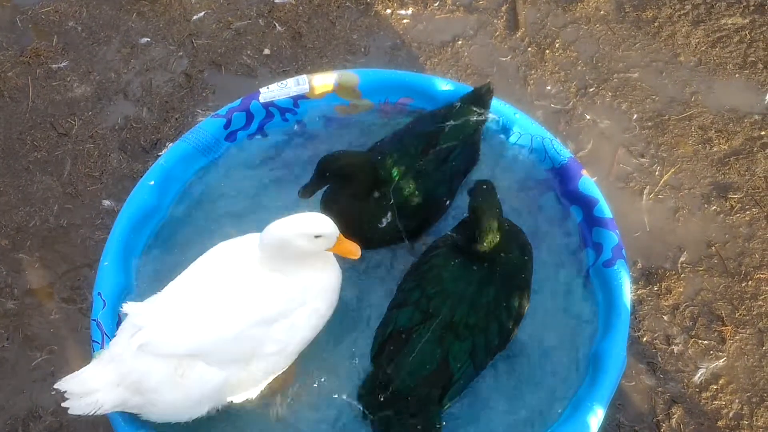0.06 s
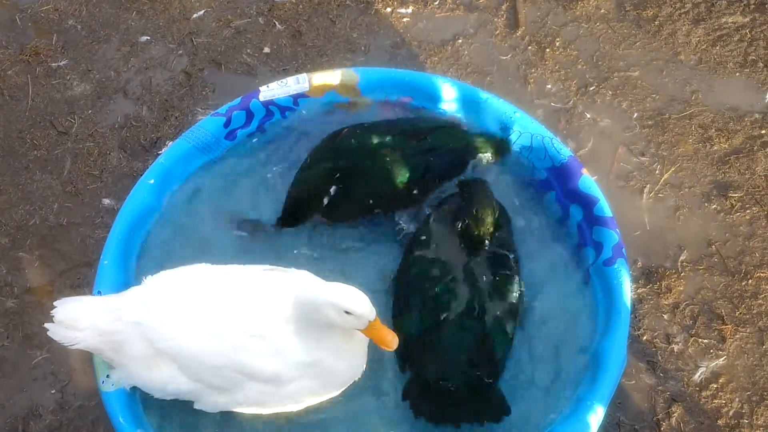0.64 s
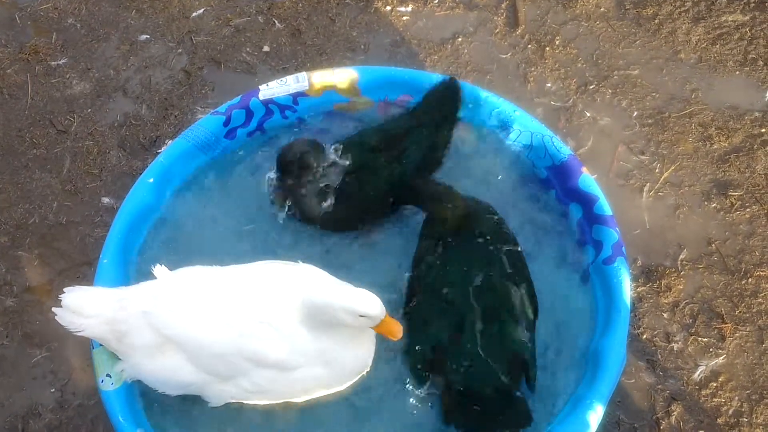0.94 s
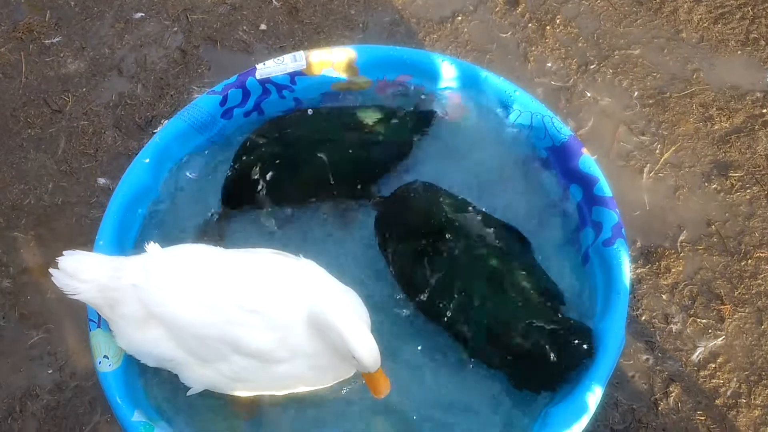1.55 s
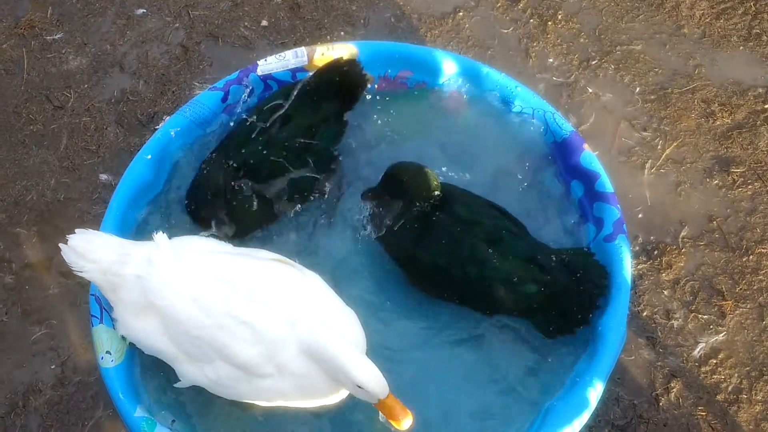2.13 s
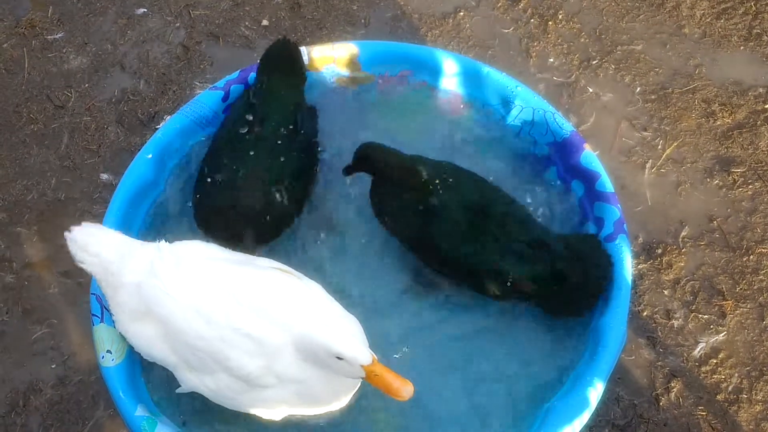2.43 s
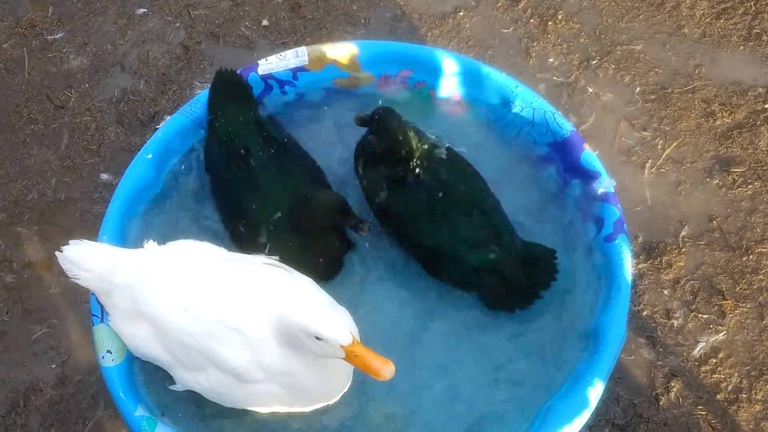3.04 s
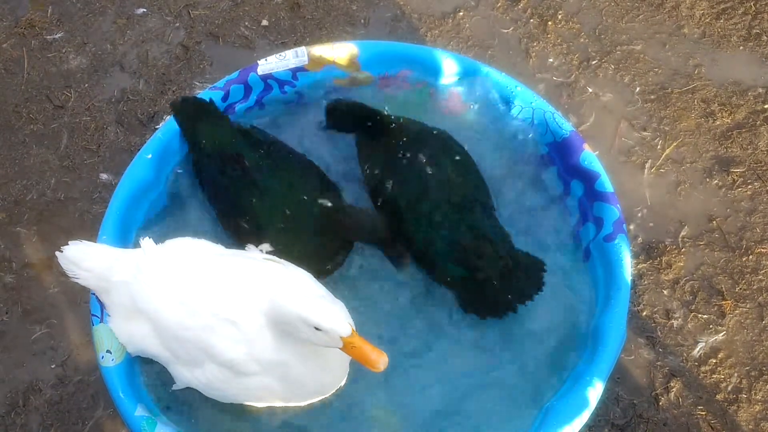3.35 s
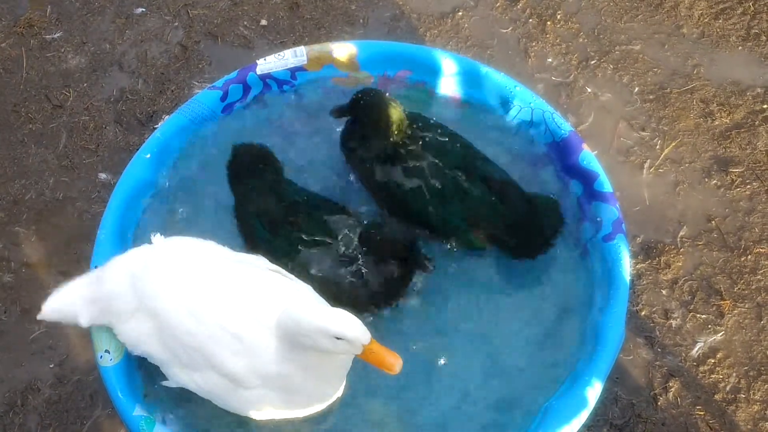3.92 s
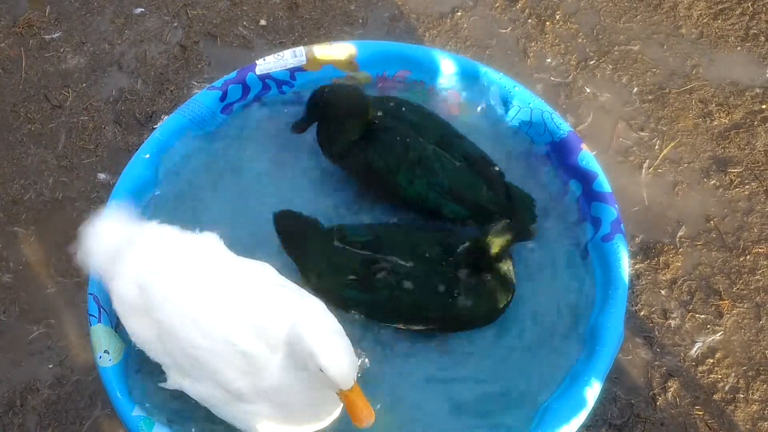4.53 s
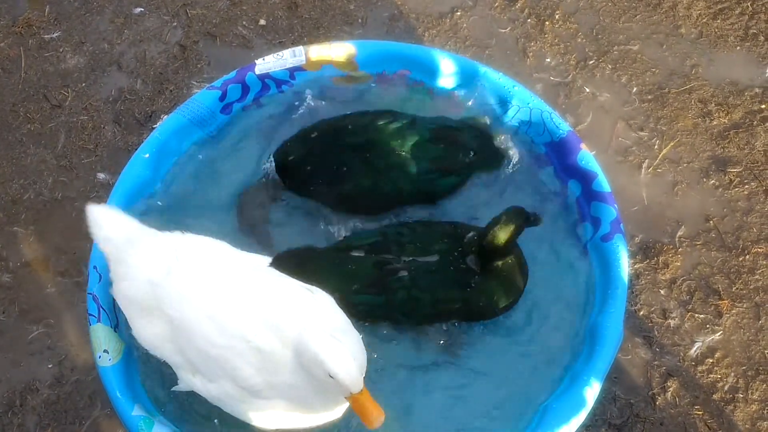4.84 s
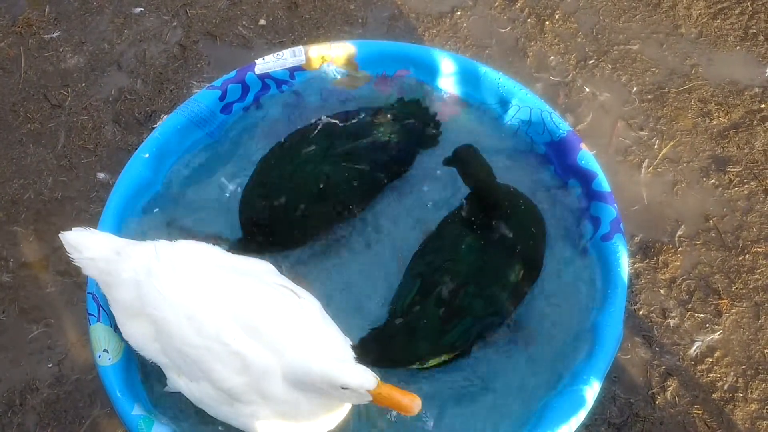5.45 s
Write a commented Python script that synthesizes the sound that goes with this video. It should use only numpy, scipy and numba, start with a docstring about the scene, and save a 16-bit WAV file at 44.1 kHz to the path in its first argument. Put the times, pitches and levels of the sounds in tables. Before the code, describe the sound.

Water sloshes and bubbles close below the microphone as ducks paddle around a plastic pool in quiet open air. A short cluster of rubbery squeaks ends in a hollow knock. Dipping heads then make small irregular splashes and scatter ticking drops, with soft deep pulses from their strokes. Feet judder on the pool wall midway, splashing picks up again, and a few more squeaks and knocks come toward the end.

```python
"""Three ducks squeak, judder and splash in a small plastic pool outdoors, a metre below the microphone.
Stick-slip friction of wet feet and bodies on the plastic gives the squeaks and rings the pool wall.
Dipping heads trap air, which resonates as bubbles, and throw spray that falls back as drops.
Paddle strokes send out low pressure pulses, and the stirred water gurgles and sloshes beneath."""
import sys
import numpy as np
from scipy import signal
from scipy.fft import rfft, irfft
from scipy.io import wavfile
from numba import njit

SR = 44100
rng = np.random.default_rng(int(sys.argv[2]) if len(sys.argv) > 2 else 0)


def waveform_to_disk(signal):
    """Save audio, clipped to [-1, 1], as 16-bit WAV at the path in sys.argv[1]."""
    frames = np.transpose(np.atleast_2d(signal))
    scaled = np.clip(frames, -1, 1) * 32767
    samples = np.round(scaled).astype(np.int16)
    wavfile.write(sys.argv[1], SR, samples)


N = 250488
T = np.arange(N) / SR


def amp(db):
    """Amplitude ratio of a level in decibels."""
    return 10 ** (np.asarray(db) / 20)


def unit(x):
    """Normalisation to rms 1."""
    return x / np.sqrt(np.mean(x ** 2))


def band(x, lo_hz, hi_hz, order=2):
    """Butterworth band-pass."""
    return signal.sosfilt(signal.butter(order, [lo_hz, hi_hz], "band", fs=SR, output="sos"), x)


def noise(lo_hz, hi_hz, order=2, shape=N):
    """Band-limited Gaussian noise; rms 1."""
    return unit(band(rng.standard_normal(shape), lo_hz, hi_hz, order))


def colour(x, spectrum):
    """Spectral shaping by rows of (frequency [Hz], gain [dB])."""
    hz, db = np.transpose(spectrum)
    f = np.fft.rfftfreq(N, 1 / SR) + 1
    return irfft(rfft(x) * amp(np.interp(np.log(f), np.log(hz), db)), N)


def curve(table, column):
    """Amplitude envelope interpolated from a level column of a table."""
    rows = np.array(table, float)
    return amp(np.interp(T, rows[:, 0], rows[:, column]))


def wake(times, db, rise_s, fall_s):
    """Incoherent addition: the envelopes of disturbances that swell and decay sum in power."""
    age = T[:SR]
    shape = np.minimum(age / rise_s, 1) * np.exp(-np.maximum(age - rise_s, 0) / fall_s)
    power = np.zeros(N + SR)
    for first, gain in zip(T.searchsorted(times), amp(db)):
        power[first:first + SR] += (gain * shape) ** 2
    return np.sqrt(power[:N])


@njit
def rings(start, hz, t60, size, glide):
    """Damped oscillators: each builds up in about a cycle and rises in pitch by the fraction glide."""
    out = np.zeros(N)
    for k in range(len(start)):
        first, life, phase = int(start[k] * SR), t60[k] * SR, 0.
        for i in range(max(0, min(int(life), N - first))):
            phase += 2 * np.pi * hz[k] * (1 + glide * i / life) / SR
            envelope = (1 - np.exp(-phase / np.pi)) * np.exp(-np.log(1000) * i / life)
            out[first + i] += size[k] * envelope * np.sin(phase)
    return out


def bubbles(count, lo_hz, hi_hz, cycles, spread_db, glide):
    """Bubble resonance in a random cloud, with power-law amplitudes; rms 1."""
    when, pitch, life, size = rng.random((count, 4)).T
    hz = lo_hz * (hi_hz / lo_hz) ** pitch
    t60 = cycles * (.5 + life) ** 2 / hz
    gain = amp(-spread_db * np.log(np.maximum(size, .02)))
    return unit(rings(when * N / SR, hz, t60, gain, glide))


def ambience():
    """Diffuse noise: low outdoor air and a faint hiss, uncorrelated between the channels."""
    air = amp(-53.5) * noise(110, 1230, shape=(2, N))
    hiss = amp(-64) * noise(930, 7600, order=1, shape=(2, N))
    return air + hiss


# the body of water swinging in the pool: (time [s], level [dB])
SLOSH_LEVELS = [(0, -52), (.95, -34), (1.3, -41), (1.8, -38), (2.6, -40.5), (3, -45), (3.6, -47.5),
                (4.1, -38.5), (5.1, -47), (5.67, -53)]

def slosh():
    """Wave collision: small waves meet and give short, low, damped pulses."""
    pulses = bubbles(count=450, lo_hz=73, hi_hz=219, cycles=5.2, spread_db=3, glide=.093)
    return curve(SLOSH_LEVELS, 1) * pulses


# paddle strokes: (time [s], level [dB], frequency [Hz])
PADDLE_STROKES = [(0.45, -17, 151), (0.676, -27, 113), (.756, -22, 194), (0.895, -10, 148),
                  (0.939, -9.5, 126), (1.041, -21, 119), (1.067, -21, 132), (2.369, -15.5, 145),
                  (2.481, -15.5, 122), (3.115, -8.5, 140), (3.944, -17.5, 114), (4.375, -15.5, 171)]

def thumps(width_cycles=.48, push_s=.0046):
    """Volume displacement: a stroke shoves the water once, giving about one cycle of pressure."""
    out = np.zeros(N)
    for time, db, hz in PADDLE_STROKES:
        cycles = (T - time - push_s) * hz
        near = abs(cycles) < 3
        window = np.exp(-(cycles[near] / width_cycles) ** 2 / 2)
        out[near] -= amp(db) * window * np.sin(2 * np.pi * cycles[near])
    return out


# spectrum of the soft wash: (frequency [Hz], gain [dB])
WASH_SPECTRUM = [(76, -25), (130, -0.5), (179, -0.5), (376, -3.5), (546, 1), (660, -5.5), (881, 1.5),
                 (1020, -1.5), (1440, -11.5), (1650, -26), (2140, -34), (3630, -120)]
# surface stirred by swimming: (time [s], bubbling level [dB], spray level [dB])
STIR_LEVELS = [(0.0, -52, -57.5), (0.4, -51.5, -60.5), (0.49, -49.5, -52.5), (1.09, -50, -47),
               (1.42, -53, -54.5), (1.99, -45, -48), (2.29, -48, -53), (2.97, -47, -48.5),
               (3.32, -48.5, -53), (3.65, -50, -51), (4.02, -44, -48.5), (4.32, -53.5, -55.5),
               (4.65, -53.5, -57.5), (4.89, -50.5, -57), (5.09, -46.5, -49.5), (5.38, -51.5, -54),
               (5.68, -46, -47.5)]

def water(gurgle_db=-2.5, wash_db=-1, churn_db=-29, foam_db=-5.5):
    """Air entrainment: swimming, strokes and splashes keep bubbles gurgling over a soft wash."""
    gurgle = bubbles(count=1400, lo_hz=577, hi_hz=1422, cycles=11.6, spread_db=6, glide=.27)
    wash = unit(colour(rng.standard_normal(N), WASH_SPECTRUM))
    times, db, _ = np.transpose(PADDLE_STROKES)
    churn = wake(times, db + churn_db, rise_s=.0072, fall_s=.018)
    foam = amp(foam_db) * showers()
    stirred = np.sqrt(curve(STIR_LEVELS, 1) ** 2 + churn ** 2 + foam ** 2)
    return stirred * (amp(gurgle_db) * gurgle + amp(wash_db) * wash)


def spatter(count, spread_db, decay_s):
    """Shot noise: sheets of water break into wet slaps, each a brief noise burst; rms 1."""
    when, size = rng.random((count, 2)).T
    gain = amp(-spread_db * np.log(np.maximum(size, .02)))
    hits = np.bincount((when * N).astype(int), gain ** 2, N)
    power = signal.lfilter([1], [1, -np.exp(-2 / (decay_s * SR))], hits)
    return unit(np.sqrt(power) * rng.standard_normal(N))


# colouring of the falling spray: (frequency [Hz], gain [dB])
SPRAY_SPECTRUM = [(700, -6), (1500, 1), (2000, 11.5), (2500, 0.5), (4800, -1), (6300, -1.5), (8000, -8.5),
                  (12500, -10.5), (15300, -4.5)]

def spray(swim_db=.5, slaps_db=.5):
    """Superposed impacts: one duck's spray lands as slaps, crackle and plinks; splashes add fizz."""
    slaps = amp(slaps_db) * spatter(count=420, spread_db=4.2, decay_s=.003)
    crackle = bubbles(count=4500, lo_hz=2200, hi_hz=15400, cycles=16, spread_db=3.2, glide=.1)
    plinks = amp(-4) * bubbles(count=800, lo_hz=1450, hi_hz=4900, cycles=34, spread_db=3, glide=.15)
    bunches = amp(2.5 * noise(8, 30))
    mist, fizz = rng.standard_normal((2, N))
    falling = bunches * (slaps + crackle) + plinks + amp(-4.5) * mist
    swimming = amp(swim_db) * curve(STIR_LEVELS, 2) * unit(colour(falling, SPRAY_SPECTRUM))
    splashing = showers() * unit(colour(fizz + (slaps + plinks) / 2, SPRAY_SPECTRUM))
    return swimming + splashing


# flung drops hitting the surface: (time [s], level [dB])
DROP_IMPACTS = [(0.1469, -41), (0.412, -33), (0.5474, -43), (0.6373, -37), (.9403, -36.5), (0.9816, -36),
                (1.0253, -37), (1.1102, -41.5), (1.514, -37.5), (1.6098, -34), (1.6597, -34), (2.0622, -36),
                (2.4628, -40.5), (2.5028, -40), (2.597, -31), (2.65, -41), (2.7394, -36), (2.7784, -33.5),
                (2.92, -33.5), (3.2342, -42.5), (3.787, -38.5), (4.452, -51), (4.462, -43.5), (4.4977, -42),
                (4.5526, -43), (4.606, -41), (5.166, -35.5), (5.4949, -34.5), (5.557, -44)]

def drops(tick_db=2.5, tick_decay_s=.0024, bubble_db=-3, bubble_hz=4400, bubble_t60=.018):
    """Drop impact: a sharp tick on the water, with the resonance of a tiny trapped bubble."""
    times, db = np.transpose(DROP_IMPACTS)
    hits = np.zeros(N)
    hits[(times * SR).astype(int)] = amp(db)
    envelope = signal.lfilter([1], [1, -np.exp(-1 / (tick_decay_s * SR))], hits)
    ticks = amp(tick_db) * envelope * noise(850, 9000, order=1)
    hz = bubble_hz * 2 ** (rng.standard_normal(len(times)) / 10)
    return ticks + rings(times, hz, np.full(len(times), bubble_t60), amp(db + bubble_db), 0.)


# plopping bubbles and, at 0.466 s, the plastic wall ringing at 745 Hz after a foot's judder:
# (time [s], frequency [Hz], level [dB], t60 [s], pitch rise [fraction])
RESONANCES = [(0.345, 4200, -17.5, 0.0042, 0.11), (.466, 745, -12, 0.055, 0.017),
              (0.748, 1033, -28, 0.084, .05), (.927, 841, -28, 0.15, 0.24), (1.044, 892, -30.5, 0.091, .1),
              (1.071, 592, -30.5, 0.23, 0.36), (2.204, 1022, -28.5, 0.075, .18),
              (2.422, 1274, -33.5, 0.057, 0.023), (2.924, 1200, -19, 0.045, 0.17),
              (3.004, 1260, -35.5, 0.11, .05), (3.799, 2540, -38, 0.042, 0.22),
              (3.801, 900, -34.5, 0.052, 1.4), (3.832, 1094, -22, 0.051, 0.57), (3.869, 626, -26, 0.048, 0),
              (4.058, 1087, -36.5, 0.12, 1.43), (4.286, 1005, -33, 0.1, 0.22),
              (5.422, 878, -35.5, 0.13, .4), (5.594, 2424, -28, 0.027, 0)]

def plops_and_wall_ring():
    """Free vibration: bubbles ring, rising in pitch near the surface, and the pool wall rings once."""
    out = np.zeros(N)
    for time, hz, db, t60, rise in RESONANCES:
        out += rings(*np.array([[time], [hz], [t60], [amp(db)]]), float(rise))
    return out


# heads and wings breaking the surface:
# (time [s], air pocket level [dB], centre frequency [Hz], spray level [dB])
SURFACE_SLAPS = [(.46, -14.5, 1070, -54), (.935, -24, 884, -49), (1.103, -29, 1080, -40.5),
                 (1.144, -23.5, 1380, -53), (1.358, -24.5, 960, -42), (1.468, -28.5, 935, -71),
                 (1.641, -21, 1260, -47), (1.764, -23.5, 970, -48), (1.891, -27.5, 1120, -67),
                 (2.025, -23, 1310, -56), (2.116, -19.5, 880, -39), (3.843, -17, 1386, -49.5),
                 (3.915, -22.5, 700, -59), (4.121, -27.5, 1050, -64), (5.226, -28, 1000, -47),
                 (5.404, -26.5, 619, -51), (5.588, -33, 765, -63)]

def splashes(count=10, mean_delay_s=.013, spread_octaves=.536, cycles=13, cluster_db=-3.5, hiss_db=-23):
    """Cavity resonance: a slap traps an air pocket, then weaker bubbles, and throws a short hiss."""
    ringing, burst = np.zeros(N), np.zeros(N)
    for time, db, centre_hz, _ in SURFACE_SLAPS:
        delay = mean_delay_s * rng.exponential(size=count)
        hz = centre_hz * 2 ** (spread_octaves * rng.standard_normal(count))
        size = amp(db + cluster_db) * np.exp(-delay / .024)
        delay[0], hz[0], size[0] = 0, centre_hz, amp(db)  # the air pocket
        ringing += rings(time + delay, hz, cycles / hz, size, .12)
        first = T.searchsorted(time)
        span = slice(first, first + SR // 5)
        burst[span] += amp(db + hiss_db) * np.exp(-(T[span] - time) / .018)
    return ringing + burst * noise(630, 5300)


def showers():
    """Exponential decay: the envelope of the spray that each splash throws up and that falls back."""
    times, _, _, spray_db = np.transpose(SURFACE_SLAPS)
    return wake(times, spray_db, rise_s=.0087, fall_s=.05)


# a foot juddering on the wall: (start [s], length [s], level [dB], centre frequency [Hz])
FOOT_JUDDERS = [(.196, 0.0059, -28, 734), (0.284, 0, -28, 550), (0.4623, .0062, -9, 1180),
                (1.283, 0, -35.5, 1030), (2.276, 0.016, -23.5, 880), (2.777, 0.0049, -26.5, 945),
                (2.809, 0.00067, -27, 910), (2.9373, 0.033, -14.5, 1030), (3.11, 0.027, -23.5, 716),
                (3.418, 0.0065, -22, 574), (3.53, 0.0087, -22, 648), (4.023, 0.0012, -25.5, 537),
                (4.2062, 0.00093, -22, 934), (4.276, 0, -29, 800), (4.619, 0.0023, -31.5, 484),
                (4.67, 0.0052, -22.5, 705), (4.826, 0.00029, -29.5, 644), (4.885, 0.013, -25, 790),
                (5.002, 0.0048, -29.5, 441.6), (5.044, 0.0036, -26, 599), (5.2098, 0.0059, -9, 629.7),
                (5.493, 0.013, -19, 1125), (5.62, 0.0013, -24, 520)]

def slips(interval_s=.008, arch_db=9.5):
    """Slow stick-slip: a judder is one slip or a run of them, strongest in its middle."""
    rows = []
    for start, length, db, hz in FOOT_JUDDERS:
        count = 1 + round(length / interval_s)
        times = np.linspace(start, start + length, count)
        off_middle = (2 * np.arange(count) + 1) / count - 1
        rows += [(time, db - arch_db * off ** 2, hz) for time, off in zip(times, off_middle)]
    return rows


# modes of the water-loaded plastic wall: (frequency [Hz], relative level [dB], t60 [s])
WALL_MODES = [(276, 7.5, 0.032), (420, 11.5, 0.016), (558, 0, 0.035), (749, 1, 0.012), (982, 7, 0.013),
              (1189, 4, 0.025), (1696, -4, 0.014), (1830, 1.5, 0.025), (2650, 0, 0.021)]

def knocks(focus_db_per_octave=7, detune=.079, patch_t60=.016, wall_db=14):
    """Modal response: each slip rings the patch under the foot and the wall modes near its pitch."""
    times, db, centre_hz = np.transpose(slips())
    mode_hz, mode_db, t60 = np.transpose(WALL_MODES)
    octaves_away = abs(np.log2(mode_hz / centre_hz[:, None]))
    weight = amp(mode_db - focus_db_per_octave * octaves_away)
    size = amp(db[:, None] + wall_db) * weight / weight.sum(axis=1, keepdims=True)
    hz = mode_hz * (1 + detune * rng.standard_normal(size.shape))
    wall = rings(np.repeat(times, len(mode_hz)), hz.ravel(), np.tile(t60, len(times)), size.ravel(), 0.)
    patch = rings(times, centre_hz, np.full(len(times), patch_t60), amp(db), 0.)
    # soft skin rounds the blow, and the thin wall radiates little bass
    return band(wall + patch, 140, 6100)


# wet skin sliding on plastic:
# (start [s], end [s], first pitch [Hz], middle pitch [Hz], last pitch [Hz], level [dB])
SKIN_SLIDES = [(0.335, 0.402, 990, 953, 1305, -19.5), (0.407, 0.431, 1480, 995, 1520, -20.5),
               (0.442, 0.468, 1156, 825, 860, -20), (0.458, 0.482, 1296, 1220, 1170, -14),
               (0.88, 0.917, 1105, 1258, 1970, -32.5), (1.125, 1.159, 924, 1260, 1900, -41),
               (1.373, 1.404, 1080, 1210, 1750, -40), (2.771, 2.819, 1240, 1774, 2990, -38),
               (4.183, 4.222, 1250, 962, 960, -35.5), (4.822, 4.88, 1304, 1845, 1030, -43.5),
               (5.059, 5.118, 792, 1157, 1010, -27), (5.19, 5.21, 1297, 910, 715.7, -23),
               (5.456, 5.518, 730, 583, 725.5, -34)]

def squeaks(overtone_db=-17, edge_s=.0068, rasp_db=-23, jitter=.035, flutter_db=2.6):
    """Fast stick-slip: a harmonic tone whose pitch follows the sliding speed; each slip rasps."""
    out = np.zeros(N)
    waver, flutter = noise(150, 450), noise(150, 450)
    scrape = amp(rasp_db) * noise(2200, 4100)
    for start, end, first_hz, middle_hz, last_hz, db in SKIN_SLIDES:
        on = (T > start) & (T < end)
        t = T[on]
        progress = (t - start) / (end - start)
        hz = np.polyval(np.polyfit([0, .5, 1], [first_hz, middle_hz, last_hz], 2), progress)
        # the slide begins smooth and turns raspy before the skin grips again
        rough = np.sin(np.pi * progress ** 2)
        phase = 2 * np.pi * np.cumsum(hz * (1 + jitter * rough * waver[on])) / SR
        # a wall resonance lifts the second harmonic near 1200 Hz
        lift_db = 13.5 * np.exp(-((2 * hz - 1200) / 300) ** 2)
        tone = np.sin(phase) + amp(overtone_db + lift_db) * np.sin(2 * phase)
        tone += amp(overtone_db - 7) * np.sin(3 * phase)
        # a second patch of skin slips at a lower pitch and beats against the first
        tone += amp(-7) * rough ** 2 * np.sin(.79 * phase)
        rasp = rough * (1 + np.cos(phase)) * scrape[on]
        swell = np.clip(np.minimum(t - start, end - t) / edge_s, 0, 1)
        out[on] += amp(db + flutter_db * rough * flutter[on]) * swell * (tone + rasp)
    return out


def widen(x, treble_lag_ms, split_hz=1400, bass_lag_ms=.099, dip_depth=.64):
    """Phase difference in a widened microphone pair: the left treble comes late and inverted."""
    f = np.fft.rfftfreq(N, 1 / SR)
    turn_per_ms = -2j * np.pi * f / 1000
    left = np.exp(turn_per_ms * bass_lag_ms) - (f / split_hz) ** 8 * np.exp(turn_per_ms * treble_lag_ms)
    # near the crossover the left dips and the right rises
    dip = 1 - dip_depth * np.exp(-((f - 1600) / 300) ** 2)
    spectrum = rfft(x)
    return np.array([irfft(spectrum * dip * left / abs(left), N), irfft(spectrum / np.sqrt(dip), N)])


def scene():
    """Superposition: pool, spray, deep pulses and outdoor air add in two channels."""
    pool = band(water() + squeaks() + knocks() + splashes() + plops_and_wall_ring(), 95, 10600) + drops()
    # two dipping ducks spray from slightly different directions
    surface = widen(pool, .558) + widen(spray(), .545) + widen(spray(), .571)
    # the deep pressure swings reach the two channels in antiphase
    deep = band(slosh() + thumps(), 52, 440, order=1) * np.array([[1], [-.78]])
    return surface + deep + ambience()


def record(dry, top_hz=15600):
    """Band limiting: a steep elliptic low-pass removes the highest treble."""
    return signal.sosfilt(signal.ellip(10, .2, 70, top_hz, fs=SR, output="sos"), dry)


dry = scene()
out = record(dry)
waveform_to_disk(out)
```